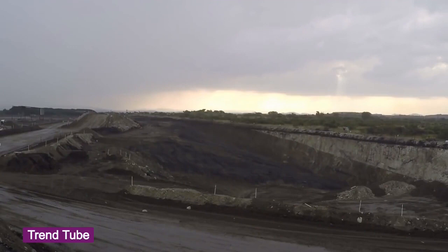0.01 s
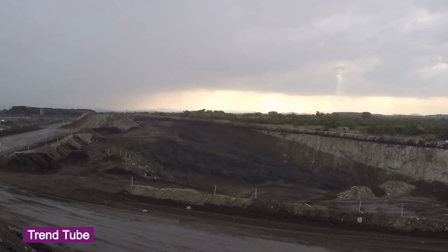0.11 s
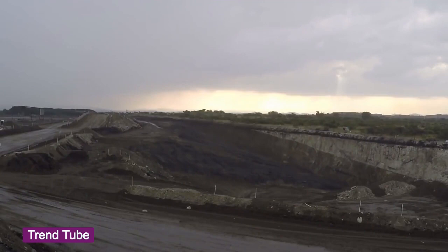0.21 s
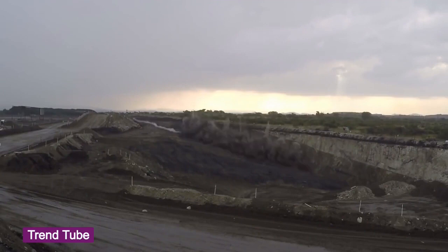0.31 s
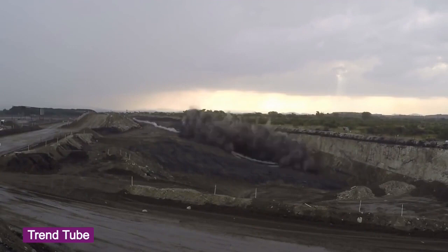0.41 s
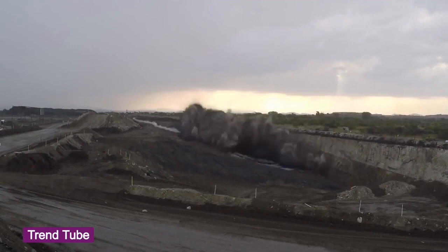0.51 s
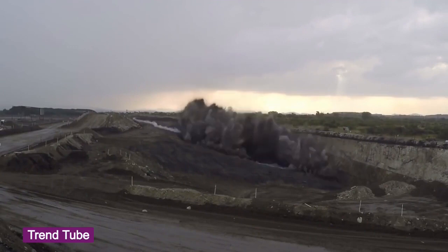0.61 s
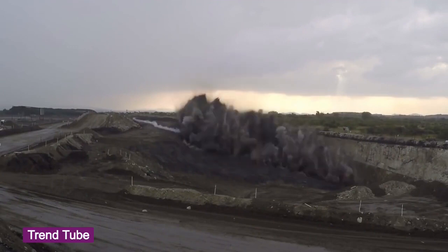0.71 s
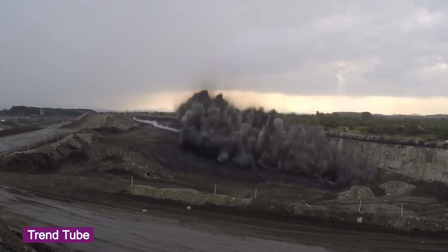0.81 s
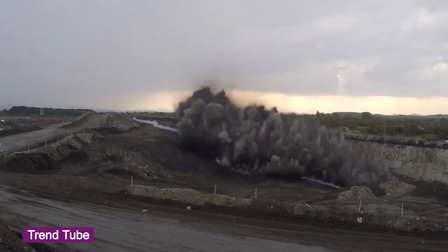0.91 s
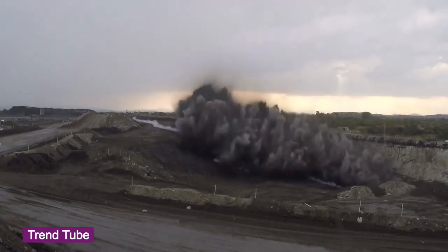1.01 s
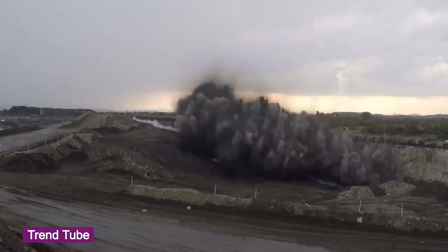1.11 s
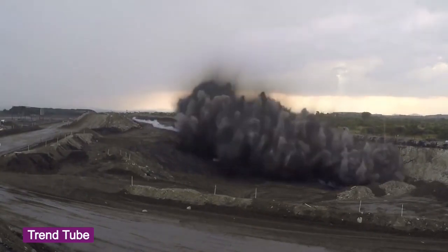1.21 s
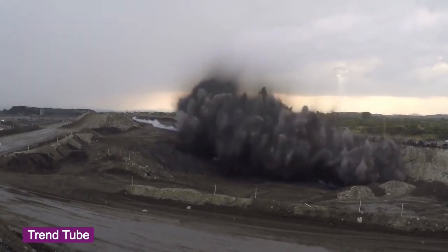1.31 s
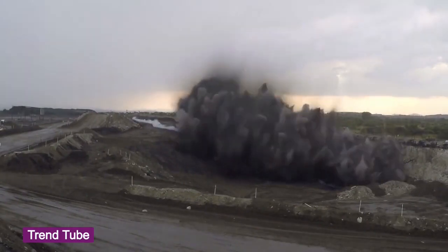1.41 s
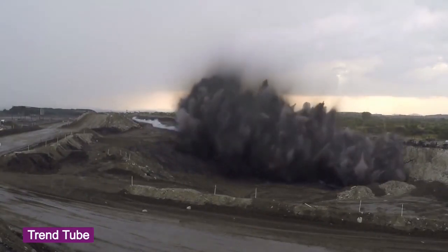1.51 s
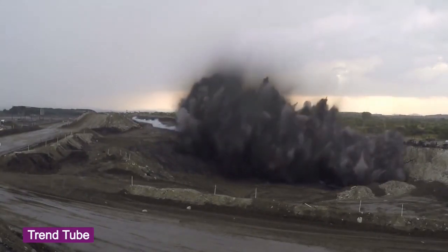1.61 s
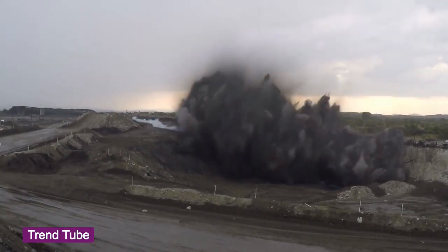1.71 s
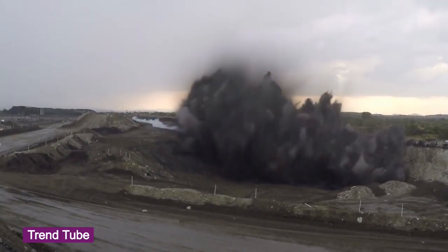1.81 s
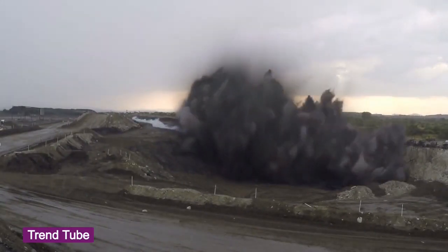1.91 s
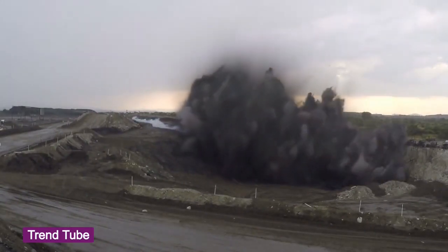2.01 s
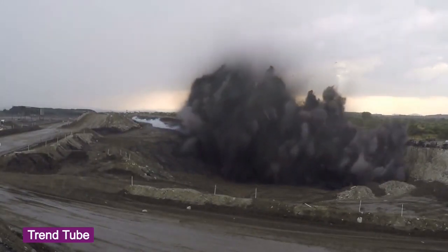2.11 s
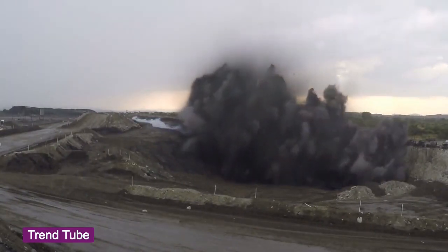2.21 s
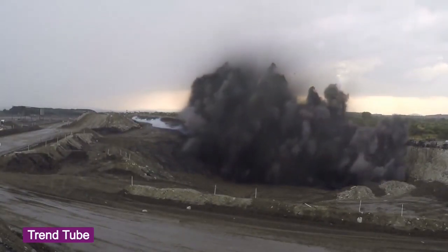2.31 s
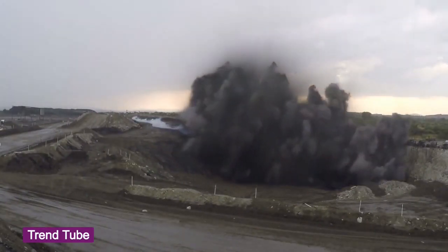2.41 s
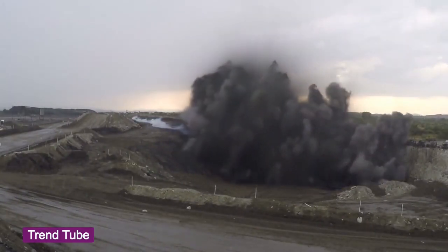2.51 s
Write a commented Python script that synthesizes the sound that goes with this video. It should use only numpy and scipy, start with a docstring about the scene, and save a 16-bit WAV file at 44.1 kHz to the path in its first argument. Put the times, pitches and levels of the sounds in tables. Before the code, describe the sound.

A quarry blast: faint rushing noise bursts into a distorted bang that stops abruptly, then low ground thumps, a rapid crackle of charges over deep rumble, and fading grainy echoes, with raindrops ticking on the microphone housing.

```python
"""A rush of noise is heard first; it bursts into an overloaded bang that stops abruptly: a quarry blast in light rain.
The bang is shaped noise and heavy low swings driven into saturation. Ground waves follow as decaying sines.
Then the air shocks of the charges crackle in a row, as filtered impulses and pressure pulses, over a deep noise
rumble with a throb, and grainy echoes die away across the pit. Raindrops tick on the housing by ringing its
modes, and a few water plops sound as soft short tones."""
import sys
import numpy as np
from scipy import signal
from scipy.fft import rfft, irfft
from scipy.io import wavfile
from scipy.ndimage import uniform_filter1d

SR = 44100
rng = np.random.default_rng(int(sys.argv[2]) if len(sys.argv) > 2 else 0)


def output_pcm(signal):
    """Save a mono or channel-first signal as 16-bit PCM at the path in sys.argv[1].

    Samples are clipped to [-1, 1] before scaling.
    """
    pcm = np.clip(np.atleast_2d(signal).T, -1, 1) * 32767
    wavfile.write(sys.argv[1], SR, np.round(pcm).astype(np.int16))


N = 114660
T = np.arange(N) / SR  # time axis, s

# Soft plops of water close by: [t/s, f/Hz, level/dB]
PLOPS = [(.652, 547, -44.5), (0.855, 530, -45), (2.387, 537, -58)]
PLOP_S = 0.003  # time constant

# Raindrops on the housing:
# [t/s, level/dB, brightness/(dB per octave), lower most strongly struck f/Hz, upper most strongly struck f/Hz]
DROPS = [(0.4593, -22.5, -4.5, 1600, 2060), (0.471, -23.5, -7, 1190, 1930), (0.473, -25.5, 6.5, 1400, 2570),
         (0.499, -50, -8, 1300, 1900), (0.5334, -37, -9, 1730, 4300), (0.6225, -49, 0.5, 3350, 4600),
         (0.7495, -11, 4.5, 1270, 3820), (0.8295, -49, -11, 1330, 4070), (1.8029, -41, -2, 2100, 3700),
         (1.8123, -44.5, 0.5, 2600, 7000), (1.9711, -28, -1.5, 2460, 3130), (2.027, -47.5, -6, 2000, 3700),
         (2.1214, -51.5, 4.5, 6000, 7500), (2.1948, -49.5, 2.5, 1100, 2780),
         (2.2442, -40.5, -1, 1880, 7360), (2.2985, -50, 1.5, 3000, 5500), (2.3097, -31.5, -4, 2220, 3550),
         (2.3367, -48, -8.5, 780, 2000), (2.4199, -22.5, 0, 2120, 3960), (2.5275, -38, -2, 2430, 2900)]
# Modes of the housing that a drop rings: [f/Hz, relative level/dB, 60 dB decay time/s]
DROP_MODES = [(590, -28, 0.014), (1094, -4.5, 0.0086), (1413, -8.5, 0.011), (1854, -9.5, 0.019),
              (2106, -8, 0.014), (2604, -10, 0.019), (2890, -28, 0.065), (2835, -9.5, 0.013),
              (3660, -8, 0.012), (4220, -11.5, 0.01), (4880, -15, 0.01), (5320, -21, 0.006),
              (7050, -16, 0.0053), (11230, -26.5, 0.0058)]
# Frequency response applied to all drops: [f/Hz, level/dB]
DROP_RESPONSE = [(700, -6), (9000, -1.5), (12500, -6.5), (16000, -25)]
BRIGHTNESS_PIVOT_HZ = 2500
MODE_SPREAD = 0.065  # full width of the random detuning, as a fraction of f
FOCUS_DB, FOCUS_OCTAVES = 6.5, 0.21  # boost of the modes near a struck frequency, and its width
SPLASH_DB, SPLASH_DECAY_S = -9.5, 0.00039
THUD_DB, THUD_S = -25, 0.0015

# Transmission of the housing, for cracks and echoes: [f/Hz, level/dB]
HOUSING = [(100, 7), (180, -0.5), (330, -0.5), (480, -1.5), (740, -5), (900, -3), (1080, -12), (1230, -16),
           (1420, -10.5), (1570, -3), (1750, -5.5), (1950, -3), (2130, -8.5), (2260, -14.5), (2540, 3.5),
           (2720, -2), (2860, 3.5), (3050, -2.5), (3300, -11.5), (3620, 0.5), (3950, -9), (4180, -3),
           (4450, -9), (4730, -5), (5350, -14.5), (5720, -8), (6100, -15), (6500, -19.5), (6900, -15),
           (7400, -19.5), (8100, -19), (9600, -27), (10100, -22), (10800, -27.5), (13000, -25.5),
           (16000, -37)]

# Centre frequencies of the echo bands: [f/Hz]
WASH_HZ = [200, 800, 1900, 3300, 10000]
# Echoes from the pit and falling rock: [t/s, then one level/dB for each band of WASH_HZ]
WASH_LEVEL = [(.48, -52.5, -62.5, -66.5, -78, -92.5), (.66, -51.5, -56.5, -65, -77, -90),
              (.925, -71, -60.5, -71.5, -83, -90), (.94, -22.5, -29.5, -30.5, -35, -39),
              (1.1, -39.5, -41, -42.5, -45, -52), (1.4, -42, -36, -39, -44, -48.5),
              (1.5, -40.5, -43, -42.5, -47, -52), (1.62, -52, -52, -51, -56, -67),
              (1.9, -59, -68, -58.5, -69.5, -68), (2.1, -69.5, -76, -66.5, -75.5, -76),
              (2.35, -74, -68, -70.5, -73, -81), (2.6, -64.5, -77, -69.5, -70, -78)]
GRAIN_DB, GRAIN_SAMPLES = 2.5, 130  # rms of the level fluctuation, and its averaging span

# Spectral shape of the low rumble: [f/Hz, relative level/dB]
RUMBLE_SPECTRUM = [(15, -23), (28, 2), (42, -3.5), (52, -1), (64, -12), (80, -13.5), (110, -28.5),
                   (200, -51.5), (500, -74.5)]
# Course of the rumble: [t/s, level/dB]
RUMBLE_LEVEL = [(0, -61.5), (.5, -58), (.6, -33.5), (.9, -35), (.96, -24), (1.11, -34), (1.4, -31),
                (1.5, -38.5), (1.67, -49), (1.9, -45.5), (2.15, -52.5), (2.45, -61), (2.6, -53.5)]
RUMBLE_TOP_HZ = 500
# The even spacing of the charges makes the air throb
THROB_HZ, THROB_DB = 52.1, -29.5
THROB_END_S, THROB_DECAY_S = 1.4, 0.14  # the throb dies away from this time

# Ground waves: [t/s, f/Hz, level/dB, rise time/s, decay time/s]
TREMOR = [(.535, 72.2, -16, 0.017, 0.083), (0.536, 41.4, -17.5, 0.048, 0.12),
          (.69, 46.5, -23.5, 0.014, 0.084)]

# Air shocks of the charges: [t/s, level/dB]
SHOCKS = [(0.9324, -15), (0.9378, -14.5), (.947, -16.5), (.953, -22), (0.956, -31), (0.962, -32),
          (0.9686, -36), (0.9742, -26), (0.9783, -30), (0.9877, -19.5), (0.9886, -18), (1.005, -22.5),
          (1.0091, -21.5), (1.0135, -24), (1.031, -26), (1.0338, -32), (1.053, -36), (1.0572, -27),
          (1.069, -19), (1.081, -36), (1.1114, -28), (1.1147, -30.5), (1.1196, -28), (1.1288, -27.5),
          (1.1366, -29), (1.1461, -24), (1.173, -28.5), (1.1876, -30), (1.2056, -28.5), (1.2121, -31),
          (1.2305, -29.5), (1.2568, -34), (1.2595, -32.5), (1.263, -28), (1.2678, -29), (1.303, -34),
          (1.3244, -34), (1.3268, -28), (1.338, -22.5), (1.362, -42), (1.3741, -28), (1.3797, -22.5),
          (1.3963, -26), (1.4203, -35.5), (1.4531, -27.5)]
CRACK_DB = 29  # gain of every crack ahead of the housing
SCATTER_DB, SCATTER_DECAY_S = -4, 0.0015
SMALL_PER_S, SMALL_DB = 80, -43  # mean rate of the small cracks; level before CRACK_DB
PUSH_DB, PUSH_S, PUSH_RISE_S = 7.5, 0.0065, 0.0021
THUMP_DB, THUMP_HZ, THUMP_S = 2, 194, 0.0012

# Spectral shape of the opening rush: [f/Hz, relative level/dB]
RUSH_SPECTRUM = [(20, 8.5), (55, -3.5), (110, -11), (260, -9), (420, 2), (560, -6.5), (900, -4.5),
                 (1290, -5.5), (2400, -10.5), (4300, -18.5), (7000, -22.5), (10000, -31), (16000, -45.5)]
# Course of the rush, before saturation: [t/s, level/dB]
RUSH_LEVEL = [(0, -38), (.06, -38.5), (.15, -38.5), (.21, -37.5), (.233, -30.5)]
# Spectral shape of the dark boom: [f/Hz, relative level/dB]
BOOM_SPECTRUM = [(30, -21.5), (150, -33), (235, -7), (375, 4), (520, -11.5), (680, 1), (820, -6),
                 (945, -0.5), (1130, -11.5), (1400, -0.5), (1650, -17), (1980, -7.5), (2400, -23),
                 (6000, -24), (16000, -41.5)]
# Spectral shape of the bright roar: [f/Hz, relative level/dB]
ROAR_SPECTRUM = [(30, -24.5), (110, -25.5), (200, -13.5), (290, -10), (390, 2), (500, -5), (660, 5),
                 (900, -2), (1200, -5), (1850, 2.5), (2080, -4.5), (2450, -2), (5000, -7), (8000, -11.5),
                 (11000, -25.5), (16000, -57.5)]
# Course of the bang, before saturation: [t/s, boom level/dB, roar level/dB]
BANG_LEVEL = [(.233, -2, -30.5), (.25, 4, -19.5), (.272, -4.5, -4.5), (.29, -12.5, -8), (.325, -19.5, -9.5),
              (.355, -18.5, -18), (.42, -43.5, -18.5), (.445, -61, -22.5)]
# Front of the bang, heavy swings that swamp the roar: [f/Hz, relative level/dB, swell time/s]
FRONT = [(369.7, 13, 0.0039), (137, -1, .002)]
# Response of the overloaded input, after saturation: [f/Hz, level/dB]
OVERLOAD_RESPONSE = [(20, 3.5), (100, -8), (220, -2.5), (1700, -0.5), (8000, 1.5), (14000, 4.5)]
BANG_START_S, BANG_END_S = 0.2333, 0.4467
CUT_RAMP_S = 0.0018
CUT_DB, CUT_DECAY_S = -23, 0.015  # residue left after the cut
SPIT_S, SPIT_DB, SPIT_DECAY_S = 0.1615, -37.5, 0.008
OVERLOAD = 0.33  # saturation amplitude of the bang

CEILING = 0.19  # limiting amplitude of all other sounds
SIDE_DB = -48.5
MIC_LOW_HZ, EDGE_HZ = 21.2, 16000


def amp(db):
    """Decibel law: the amplitude ratio of a level difference."""
    return 10 ** (np.asarray(db) / 20)


def unit(x):
    """Normalisation to unit rms."""
    return x / np.sqrt(np.mean(x ** 2) + 1e-20)


def level(rows, axis=1):
    """Envelope: gain over time, interpolated linearly in level from one column."""
    rows = np.array(rows)
    return amp(np.interp(T, rows[:, 0], rows[:, axis]))


def response(hz, points):
    """Magnitude response: gain at each frequency, interpolated in level on a logarithmic axis."""
    f, db = np.transpose(points)
    return amp(np.interp(np.log(hz + 1), np.log(f), db))


def colour(x, points):
    """Minimum-phase filtering: the log gain and its Hilbert transform fix a causal response."""
    hz = abs(np.fft.fftfreq(4096, 1 / SR))
    log_gain = np.log(response(hz, points))
    log_spectrum = np.conj(signal.hilbert(log_gain))
    taps = np.fft.ifft(np.exp(log_spectrum)).real
    return signal.fftconvolve(x, taps[:len(taps) // 2])[:len(x)]


def noise(points):
    """Spectral shaping: white Gaussian noise weighted in frequency, at unit rms."""
    hz = np.fft.rfftfreq(N, 1 / SR)
    white = rfft(rng.standard_normal(N))
    return unit(irfft(white * response(hz, points), N))


def steadied(x, span_s):
    """Running normalisation: division by the local rms evens out slow chance swells."""
    size = max(int(span_s * SR), 2)
    power = uniform_filter1d(uniform_filter1d(x ** 2, size), size)
    return x / np.sqrt(abs(power) + 1e-12)


def add(mix, s, sound):
    """Superposition: sums a sound into the mix from time s."""
    part = mix[round(s * SR):][:len(sound)]
    part += sound[:len(part)]


def plops():
    """Damped oscillation: a sine under a quadratic rise and exponential decay gives a rounded tone."""
    out = np.zeros(N)
    t = np.arange(SR // 10) / SR
    envelope = (t / PLOP_S) ** 2 * np.exp(-t / PLOP_S)
    for s, hz, db in PLOPS:
        add(out, s, amp(db) * envelope * np.sin(2 * np.pi * hz * t))
    return out


def drops():
    """Modal excitation: each drop thuds, splashes and rings the plastic housing, its place weighting the modes."""
    out = np.zeros(N)
    t = np.arange(SR // 10) / SR
    hz, db, t60 = np.array(DROP_MODES).T[:, :, None]
    sign = (-1) ** np.arange(len(hz))[:, None]  # neighbouring modes start in opposite directions
    thud = amp(THUD_DB) * t / THUD_S * np.exp(-t / THUD_S)
    for s, size_db, bright_db, *struck_hz in DROPS:
        own_hz = hz * (1 + MODE_SPREAD * (rng.random(hz.shape) - .5))
        focus = sum(np.exp(-(np.log2(hz / f) / FOCUS_OCTAVES) ** 2) for f in struck_hz)
        tilt_db = bright_db * np.log2(hz / BRIGHTNESS_PIVOT_HZ)
        own_db = db + tilt_db + FOCUS_DB * focus
        modes = sign * amp(own_db - 60 * t / t60) * np.sin(2 * np.pi * own_hz * t)
        ring = modes.sum(0)
        splash_gain = amp(SPLASH_DB + 2 * bright_db)  # brighter drops splash more
        splash = splash_gain * rng.standard_normal(len(t)) * np.exp(-t / SPLASH_DECAY_S)
        add(out, s, amp(size_db) * (thud + ring + splash))
    return colour(out, DROP_RESPONSE)


def wash():
    """Diffuse reflection: grainy noise in overlapping bands, each with its own level, for echoes and falling rock."""
    fluctuation = unit(uniform_filter1d(rng.standard_normal(N), size=GRAIN_SAMPLES))
    grain = amp(GRAIN_DB * fluctuation)
    spectrum = rfft(unit(colour(rng.standard_normal(N) * grain, HOUSING)))
    hz = np.fft.rfftfreq(N, 1 / SR)
    place = np.interp(np.log(hz + 1), np.log(WASH_HZ), np.arange(len(WASH_HZ)))
    out = np.zeros(N)
    for k in range(len(WASH_HZ)):
        weight = np.maximum(1 - abs(place - k), 0)  # triangular crossfade between bands
        out += irfft(spectrum * weight, N) * level(WASH_LEVEL, axis=k + 1)
    return out


def rumble():
    """Low-frequency radiation: heaving rock as deep noise, with a periodic throb from the first shock on."""
    lowpass = signal.butter(4, RUMBLE_TOP_HZ, fs=SR, output="sos")
    deep = signal.sosfilt(lowpass, noise(RUMBLE_SPECTRUM))
    t = np.maximum(T - SHOCKS[0][0], 0)
    after = np.maximum(T - THROB_END_S, 0)
    throb = amp(THROB_DB) * np.exp(-after / THROB_DECAY_S) * np.sin(2 * np.pi * THROB_HZ * t)
    return steadied(deep, .04) * level(RUMBLE_LEVEL) + throb


def tremor():
    """Beating: decaying ground waves of neighbouring low frequencies superpose ahead of the air shocks."""
    out = np.zeros(N)
    for s, hz, db, rise, decay in TREMOR:
        envelope = (1 - np.exp(-(T / rise) ** 2)) * np.exp(-T / decay)
        add(out, s, amp(db) * envelope * np.sin(2 * np.pi * hz * T))
    return out


def shocks():
    """Blast pulses: each charge gives a crack scattered by the ground, a thump and a low push of air."""
    firing = (T > SHOCKS[0][0]) & (T < SHOCKS[-1][0])
    # small cracks fall at random in between
    cracks = amp(SMALL_DB + CRACK_DB) * (rng.random(N) < SMALL_PER_S / SR) * firing
    pushes = np.zeros(N)
    t = np.arange(SR // 16) / SR
    u = t / PUSH_S
    # overpressure, then suction, with a rounded onset
    push = amp(PUSH_DB) * (1 - u) * np.exp(-u) * (1 - np.exp(-t / PUSH_RISE_S))
    thump = amp(THUMP_DB) * t / THUMP_S * np.exp(-t / THUMP_S) * np.sin(2 * np.pi * THUMP_HZ * t)
    for s, db in SHOCKS:
        scatter = rng.standard_normal(len(t)) * np.exp(-t / SCATTER_DECAY_S)
        crack = amp(SCATTER_DB) * scatter / np.linalg.norm(scatter)
        crack[0] -= 1  # the direct impulse
        add(cracks, s, amp(db + CRACK_DB) * crack)
        add(pushes, s, amp(db) * (push - thump))
    return colour(cracks, HOUSING) + pushes


def bang():
    """Saturation: a rush, then a heavy front and a boom turning to roar overload the input and stop short."""
    rush = steadied(noise(RUSH_SPECTRUM), 0.021) * level(RUSH_LEVEL) * (T < BANG_START_S)
    # a brief bright spit of noise within the rush
    spit_decay = (T > SPIT_S) * np.exp(-abs(T - SPIT_S) / SPIT_DECAY_S)
    spit = noise([(1500, -10.0), (7000, 13.0), (16000, -23.0)]) * amp(SPIT_DB) * spit_decay
    t = np.maximum(T - BANG_START_S, 0)
    front = np.zeros(N)
    for hz, db, swell in FRONT:
        front -= amp(db) * (t / swell) ** 2 * np.exp(-t / swell) * np.sin(2 * np.pi * hz * t)
    boom = steadied(noise(BOOM_SPECTRUM), 0.015) * level(BANG_LEVEL, axis=1)
    roar = steadied(noise(ROAR_SPECTRUM), 0.019) * level(BANG_LEVEL, axis=2)
    held = np.clip((BANG_END_S - T) / CUT_RAMP_S + .5, 0, 1)
    residue = amp(CUT_DB) * np.exp(-abs(T - BANG_END_S) / CUT_DECAY_S)
    gate = (T >= BANG_START_S) * np.maximum(held, residue)
    drive = rush + spit + (front + boom + roar) * gate
    return colour(OVERLOAD * np.tanh(drive / OVERLOAD), OVERLOAD_RESPONSE)


def rounded(x, ceiling):
    """Soft limiting: small swings stay linear, peaks flatten towards the ceiling."""
    return x / np.sqrt(np.sqrt(1 + np.square(np.square(x / ceiling))))


def scene():
    """Superposition and limiting: the microphone rounds the peaks; a faint derivative makes left and right differ."""
    background = plops() + drops() + wash() + rumble()
    mid = rounded(background + tremor() + shocks(), CEILING) + bang()
    side = amp(SIDE_DB) * np.gradient(mid)
    return np.array([mid + side, mid - side])


def record(dry):
    """Band limitation: the microphone's first-order low cut and a steep upper edge."""
    thinned = signal.lfilter(*signal.butter(1, MIC_LOW_HZ, "high", fs=SR), dry)
    taps = signal.firwin(511, EDGE_HZ, window=("kaiser", 9), fs=SR)
    return signal.oaconvolve(thinned, taps[None], "same")


dry = scene()
out = record(dry)
output_pcm(out)
```